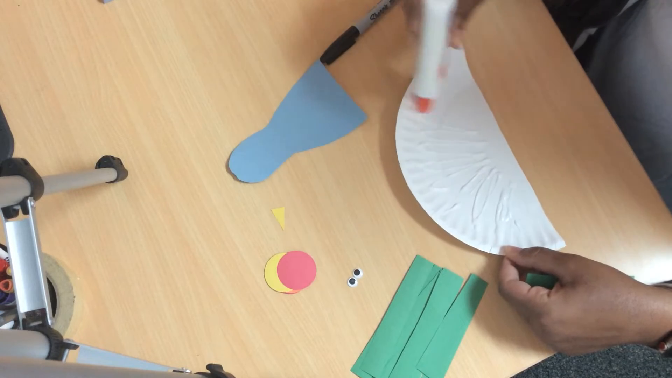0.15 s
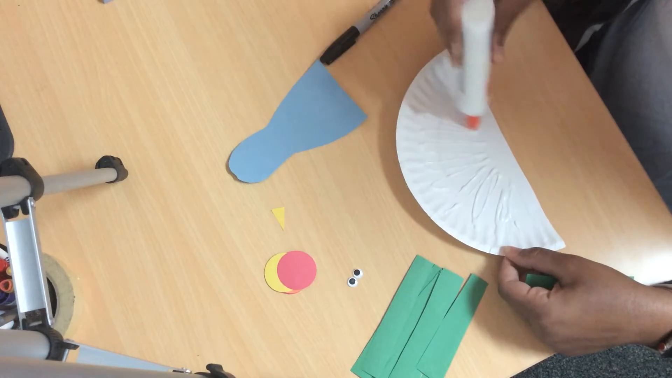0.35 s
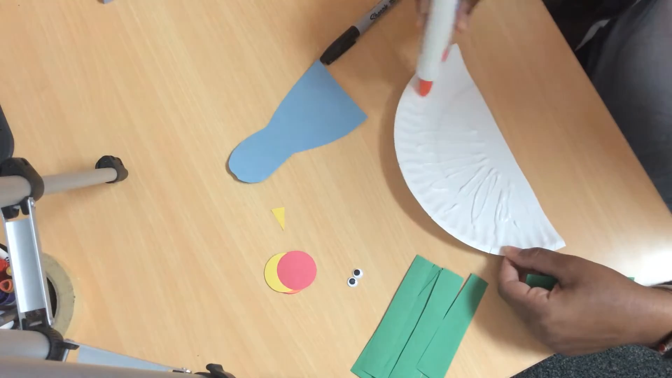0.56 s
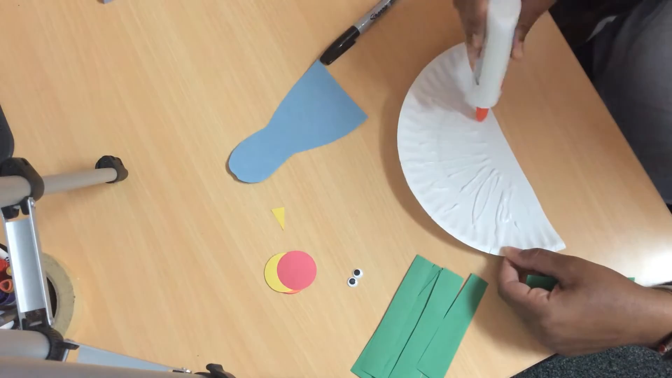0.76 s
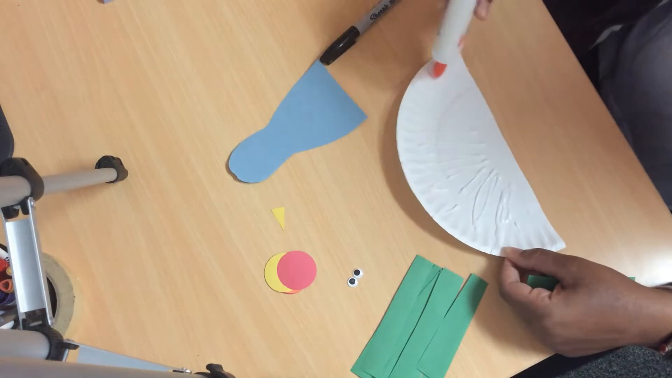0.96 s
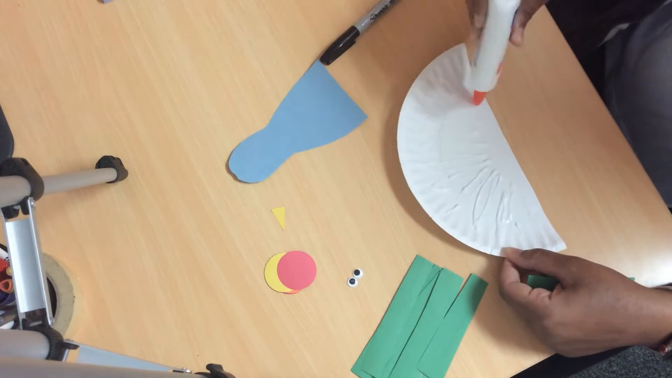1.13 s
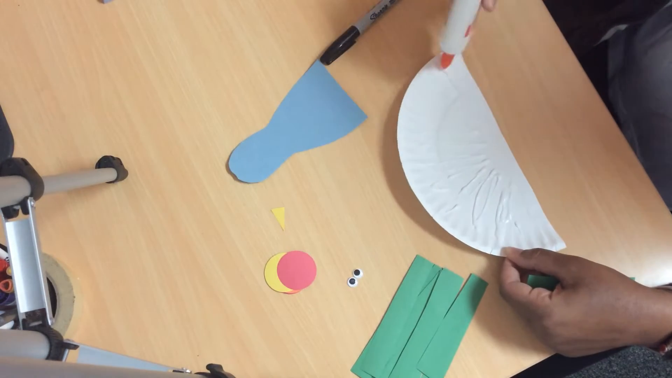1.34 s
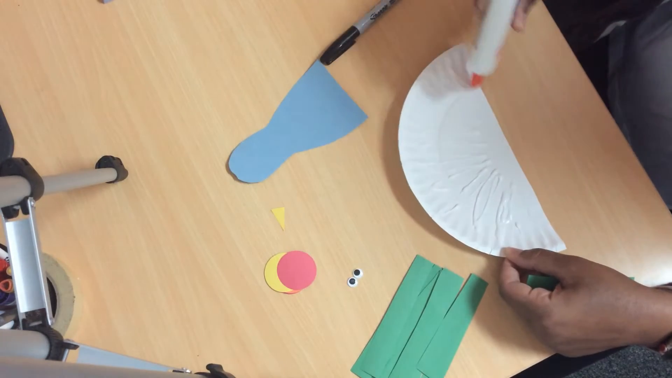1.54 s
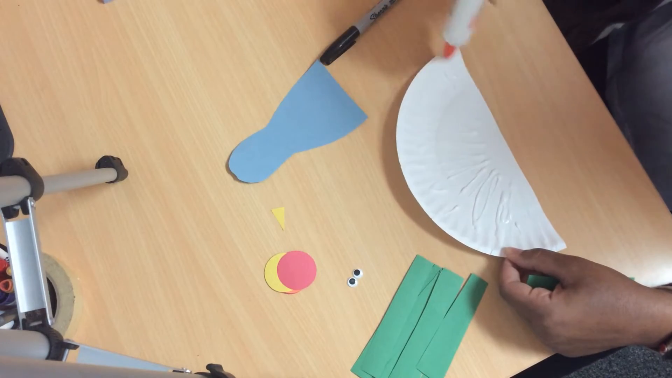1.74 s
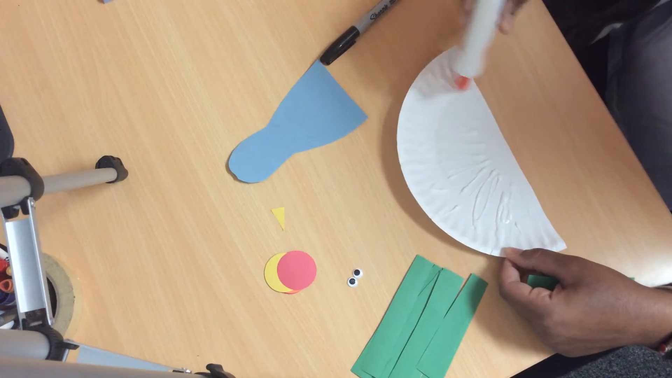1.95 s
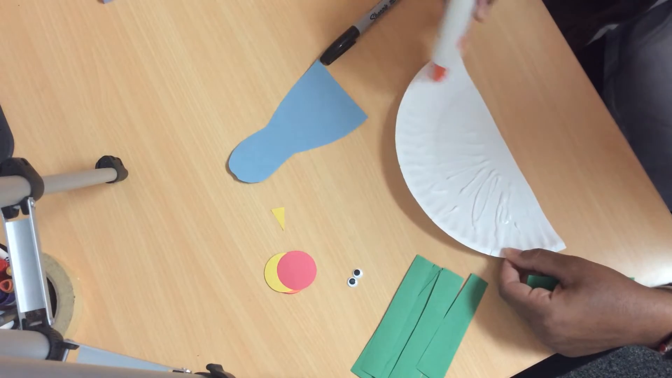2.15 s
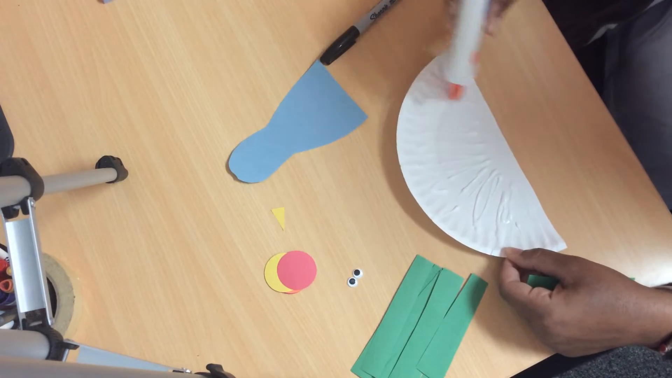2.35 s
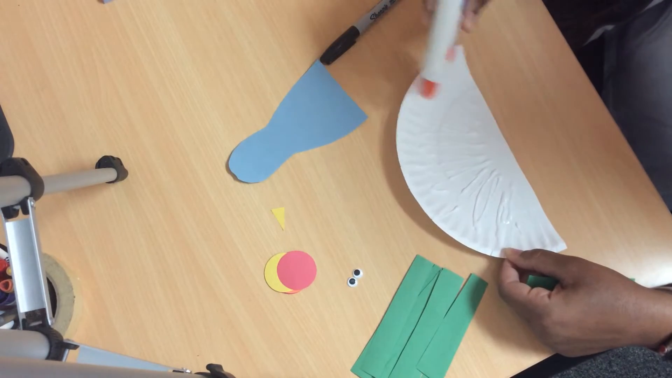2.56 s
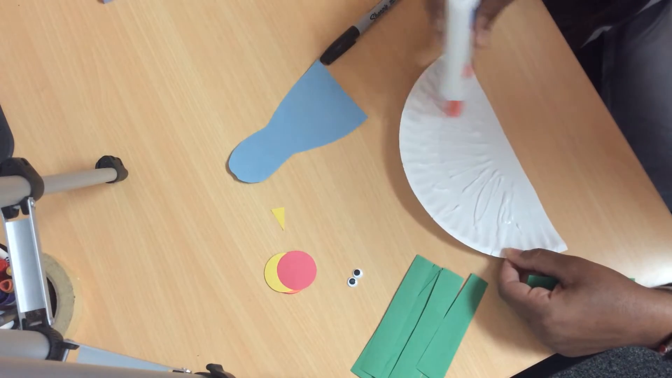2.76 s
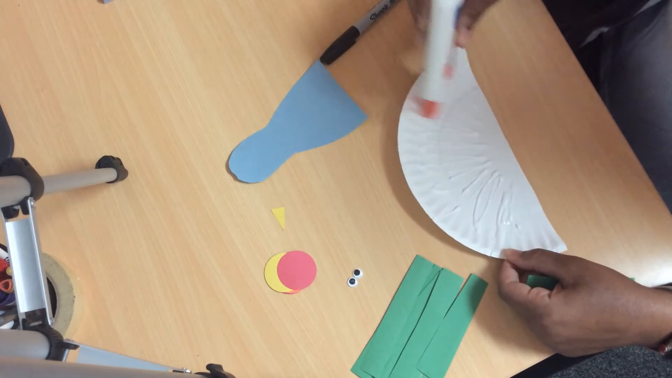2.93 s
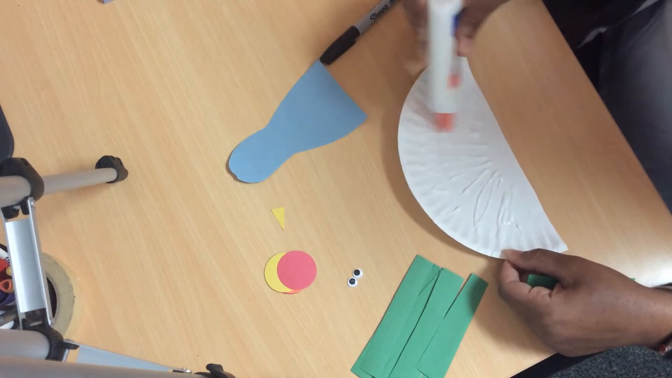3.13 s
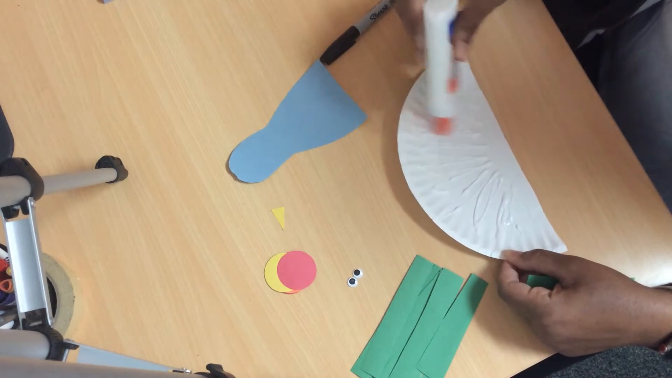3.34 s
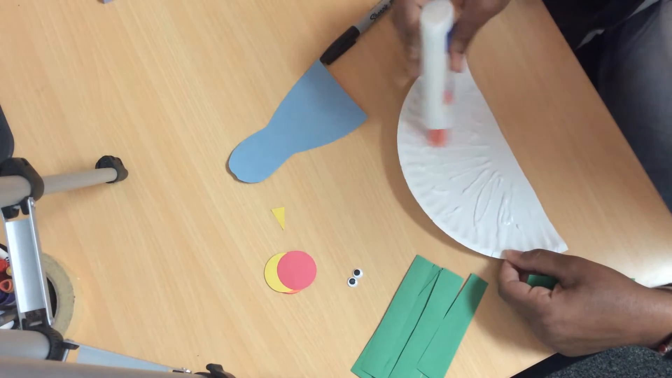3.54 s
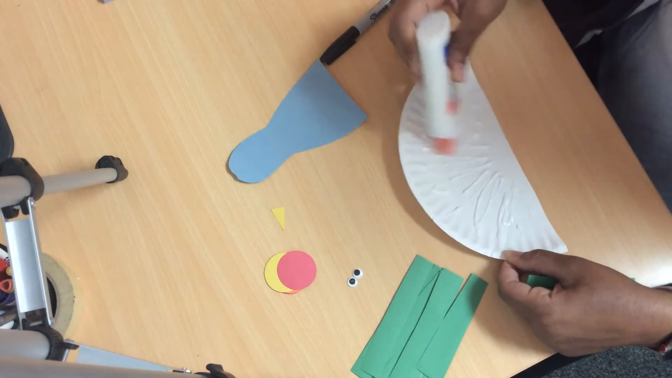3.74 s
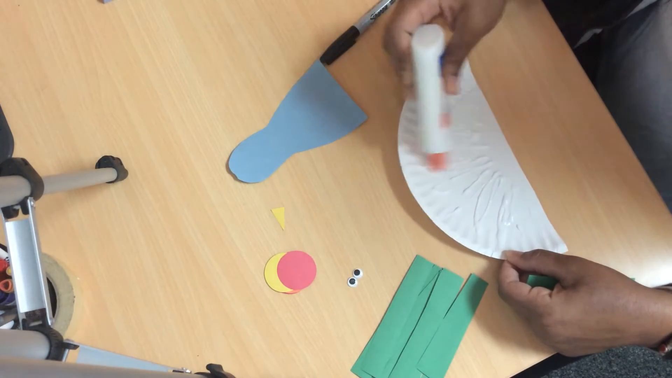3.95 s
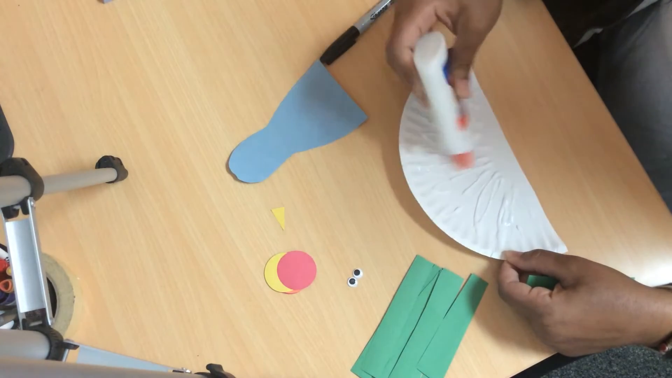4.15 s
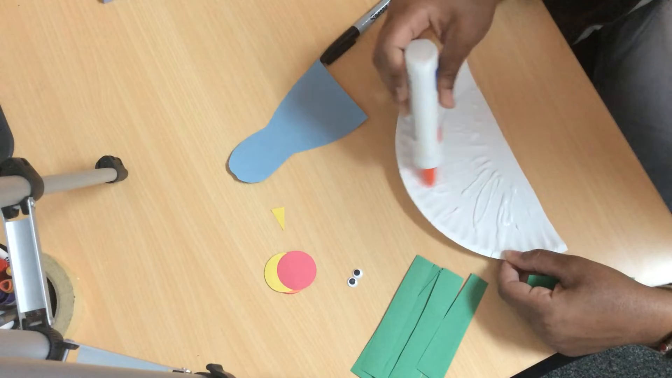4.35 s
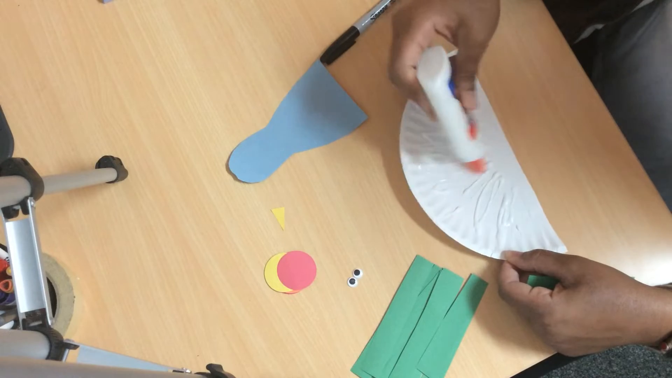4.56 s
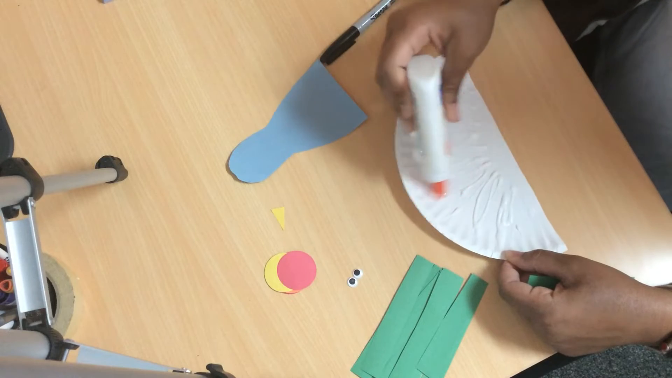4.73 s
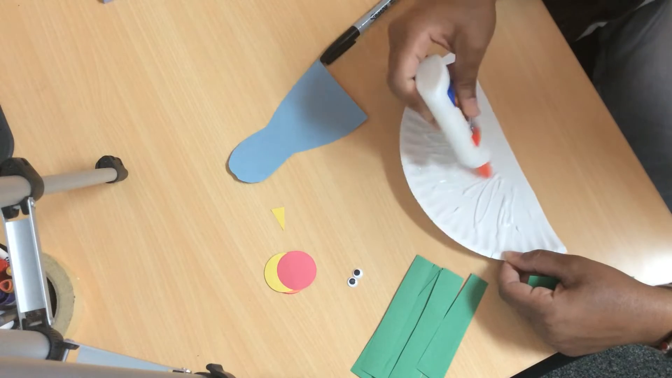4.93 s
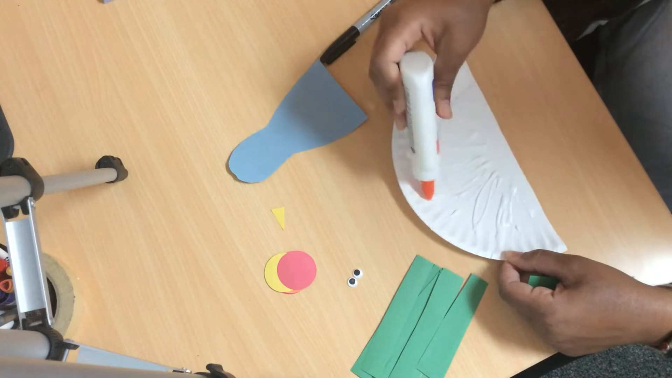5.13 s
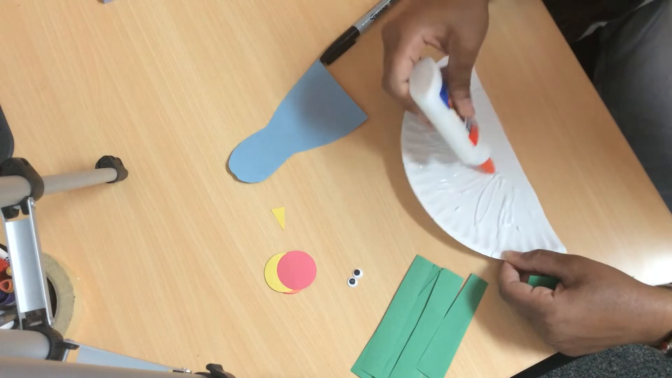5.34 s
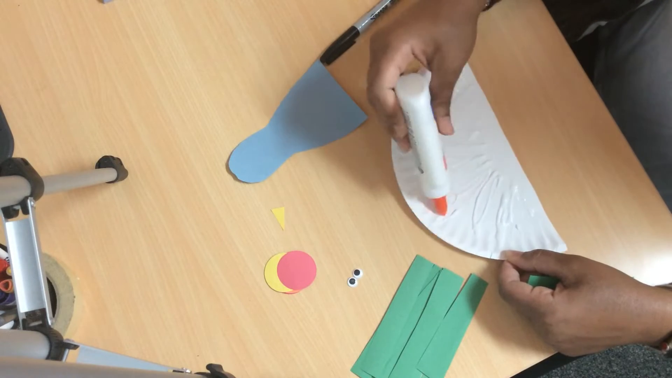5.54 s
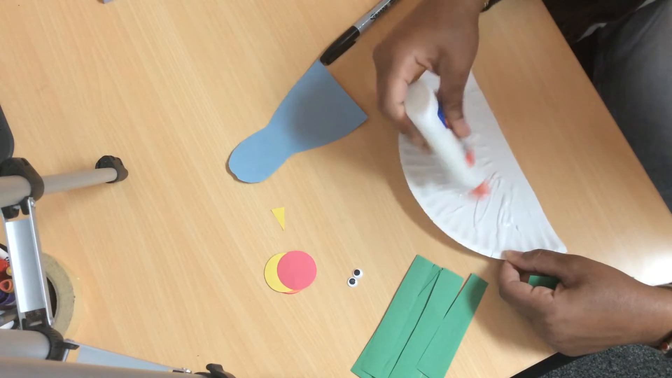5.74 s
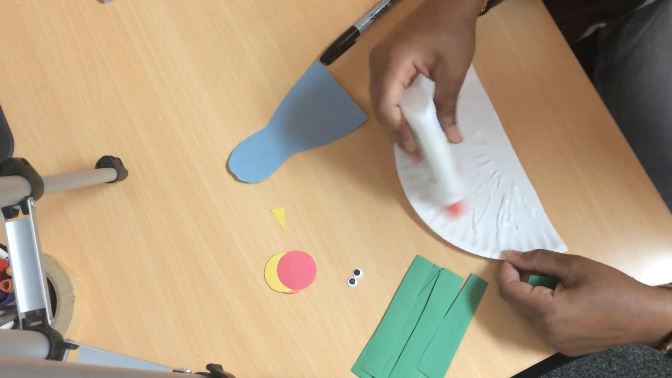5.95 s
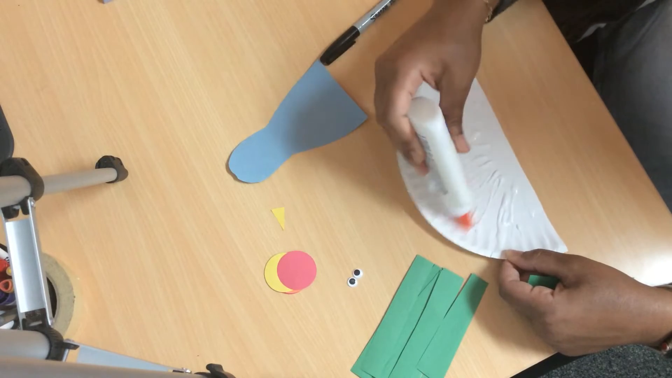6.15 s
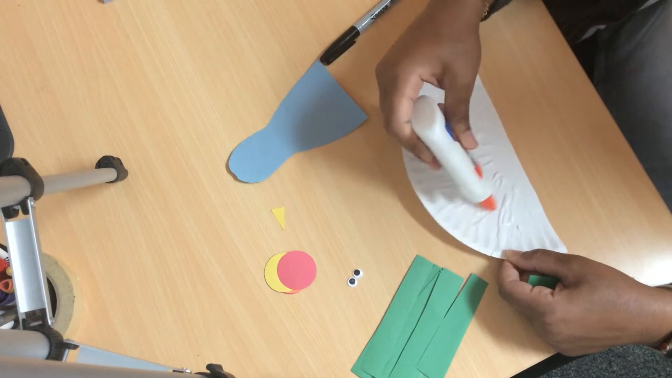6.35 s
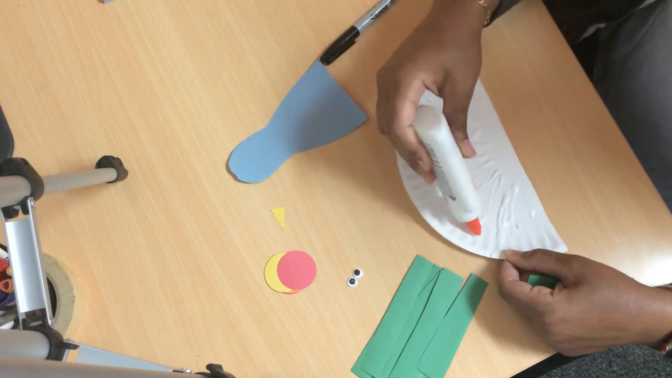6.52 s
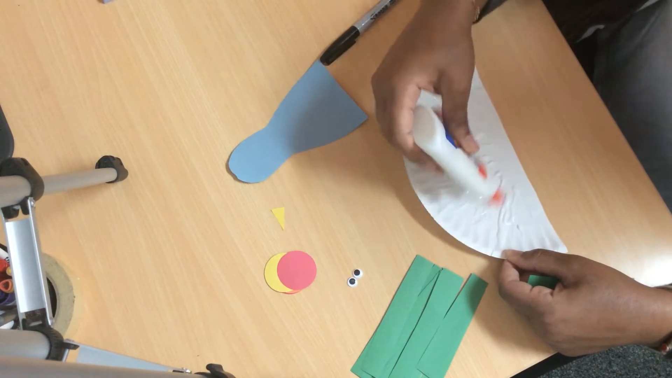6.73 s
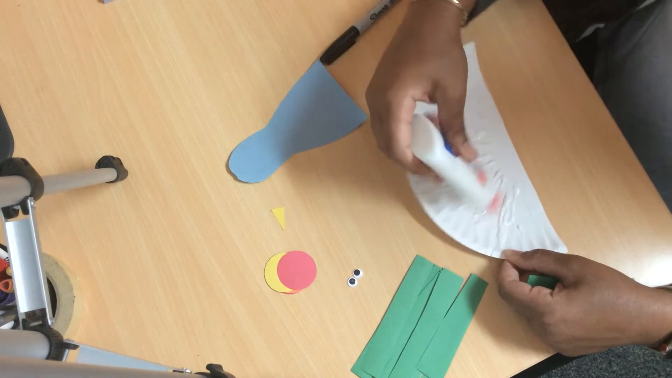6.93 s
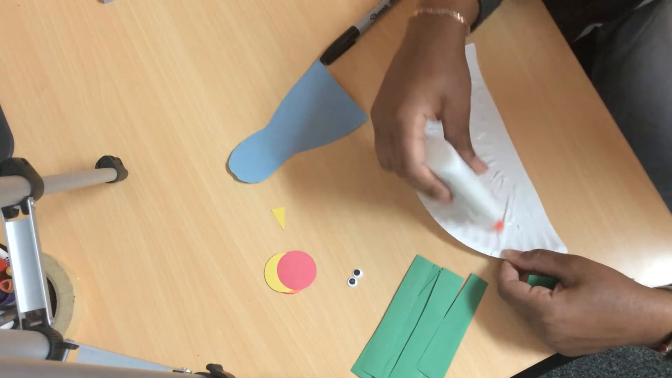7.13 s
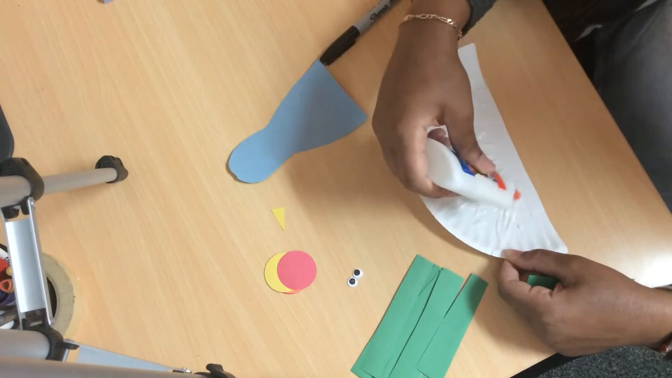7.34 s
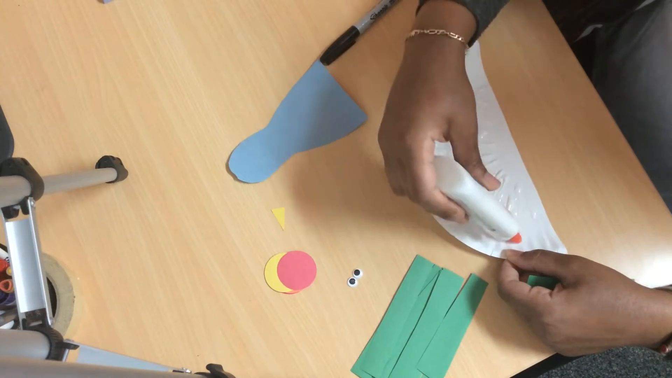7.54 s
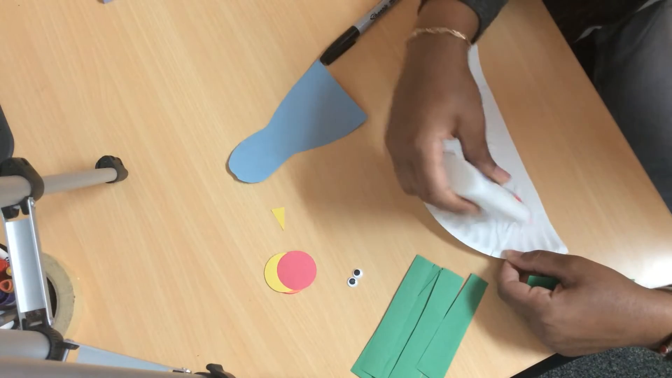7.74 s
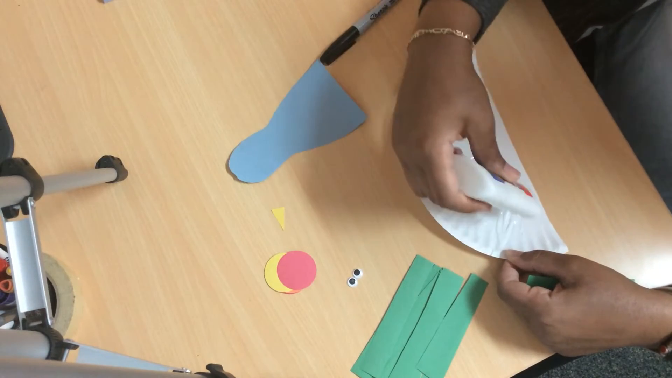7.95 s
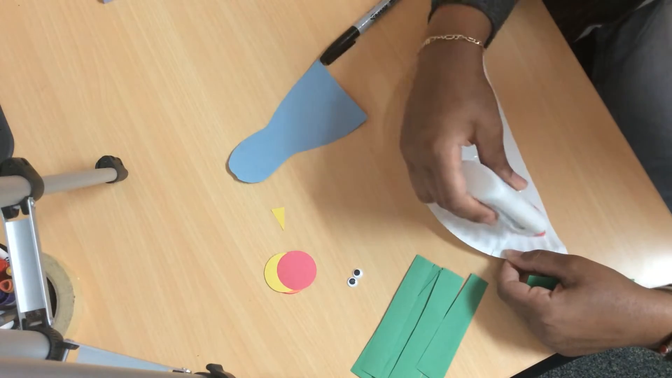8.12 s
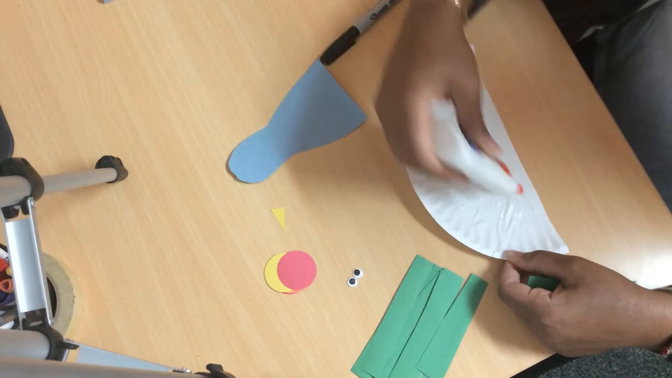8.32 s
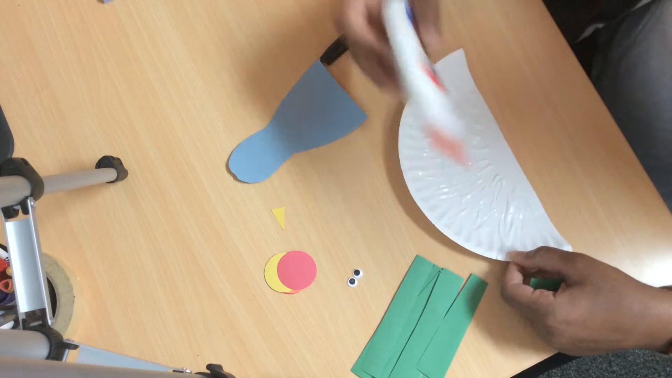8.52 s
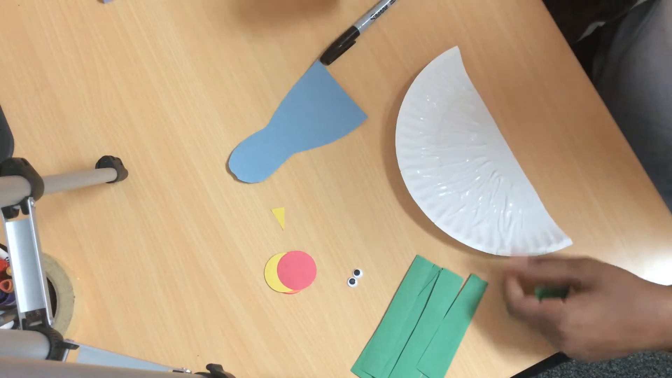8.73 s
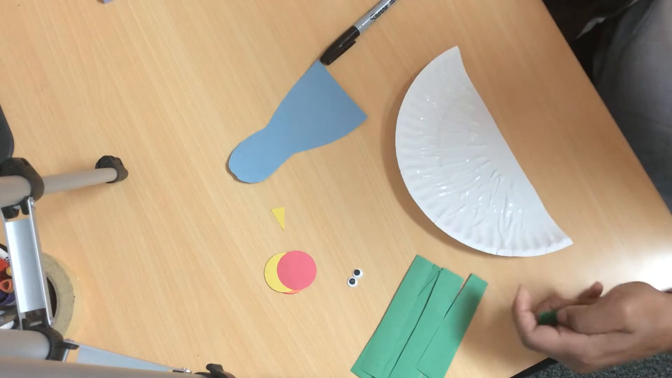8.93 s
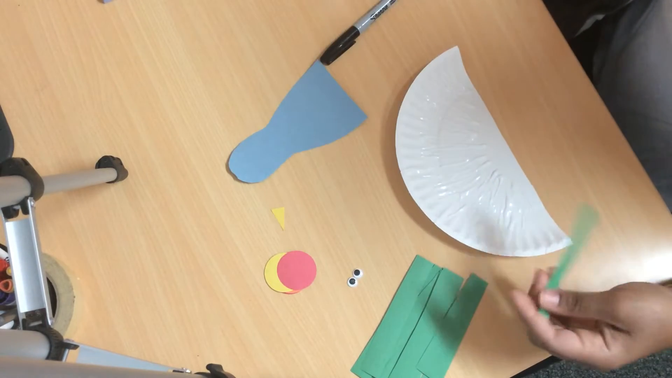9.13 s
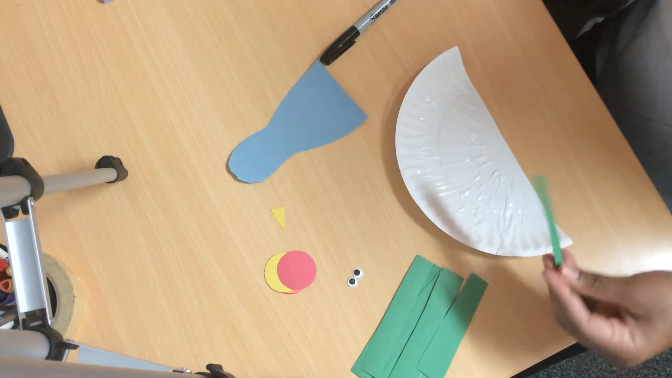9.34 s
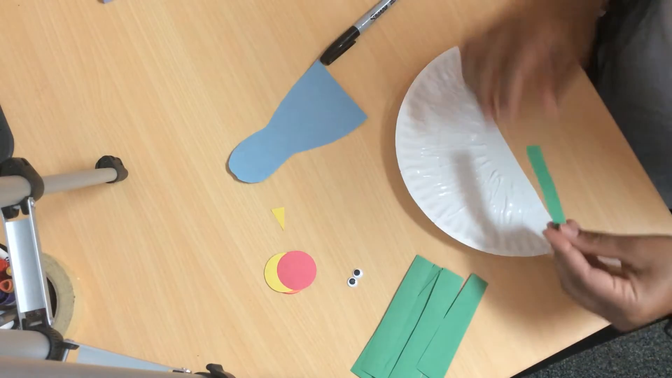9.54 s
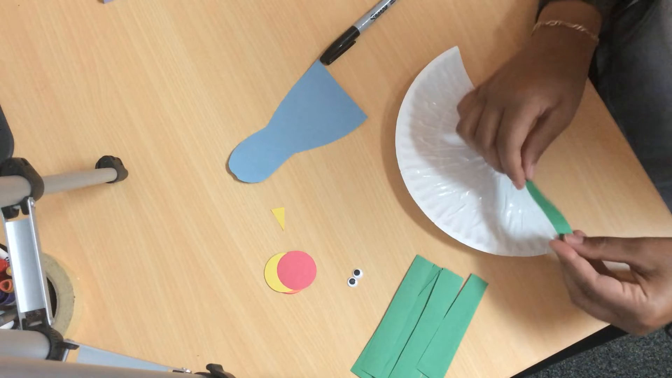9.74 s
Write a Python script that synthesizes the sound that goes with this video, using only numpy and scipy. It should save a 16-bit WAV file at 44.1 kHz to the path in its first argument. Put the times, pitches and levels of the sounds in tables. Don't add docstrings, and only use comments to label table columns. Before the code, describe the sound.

A glue bottle's nozzle scratches back and forth over a ridged paper plate with crisp ticks, then one loud knock on a wooden table.

```python
import sys
import numpy as np
from scipy import signal
from scipy.io import wavfile
from scipy.ndimage import uniform_filter1d

SR = 44100
rng = np.random.default_rng(int(sys.argv[2]) if len(sys.argv) > 2 else 0)


def unload_audio(sound):
    columns = np.transpose(np.atleast_2d(sound))
    steps = np.round(np.clip(columns, -1, 1) * 32767)
    wavfile.write(sys.argv[1], SR, steps.astype(np.int16))


def makeup_ratio(level_db):
    decades = np.asarray(level_db, float) / 20
    return 10 ** decades


N = 435708

# (fastest at [s], length [s], level
# [dB], brightness [dB])
STROKES = [(0.094, 0.16, -54, 1), (0.165, 0.11, -54.5, 7), (0.273, 0.16, -59.5, -8),
           (0.363, 0.11, -60.5, 3), (0.537, 0.14, -55.5, 4), (0.605, 0.13, -55.5, 7),
           (0.697, 0.093, -60, 1), (0.773, 0.23, -60, 7), (1.019, 0.18, -57, 4),
           (1.172, 0.19, -58.5, 6), (1.313, 0.054, -59, 6), (1.424, 0.18, -59, 2),
           (1.537, 0.085, -60.5, 4), (1.621, 0.062, -61, -3), (1.757, 0.061, -56, -4),
           (2.002, 0.1, -62.5, -11), (2.28, 0.18, -65.5, -6), (2.348, 0.15, -62, 8.5),
           (2.463, 0.06, -62, 1), (2.53, 0.057, -60, 5), (2.59, .06, -63, 2), (2.653, 0.078, -61.5, 0),
           (2.764, 0.13, -62, 5), (2.93, 0.2, -59.5, 1), (3.101, 0.16, -60, -3), (3.298, 0.13, -62, 7),
           (3.46, 0.26, -62.5, 3), (3.627, 0.16, -65.5, 11), (3.73, 0.039, -62, -16),
                (3.833, 0.086, -60, -9), (3.881, 0.17, -58, 8), (4.02, 0.11, -65.5, 6),
                (4.08, 0.14, -61.5, 10.5), (4.24, 0.17, -62.5, 9), (4.303, 0.11, -65, -2),
                (4.366, 0.07, -66.5, 0), (4.463, 0.078, -66, 18), (4.5, 0.055, -67, 4),
                (4.568, 0.11, -65, 11), (4.633, 0.15, -61, 5), (4.754, .06, -67.5, 7),
                (4.824, 0.14, -63.5, 9), (4.882, .06, -70, 4), (4.955, 0.095, -67, 9),
                (5.019, 0.16, -62, 10.5), (5.14, 0.11, -64.5, 8), (5.218, 0.12, -64.5, 7),
                (5.382, 0.18, -60, 12.5), (5.512, 0.098, -66, 8), (5.572, 0.11, -64, 11),
                (5.785, 0.29, -61.5, 7.5), (5.934, 0.1, -65.5, 14), (5.975, .06, -68, 5),
                (6.065, 0.22, -67.5, 12), (6.133, 0.11, -65, 0), (6.256, 0.2, -64.5, 8),
                (6.388, 0.16, -66.5, 13), (6.586, 0.077, -67, 15), (6.713, 0.23, -71, 25),
                (6.77, 0.061, -64, 4), (6.874, 0.14, -66.5, 10), (6.933, 0.12, -69.5, 16),
                (7.045, 0.14, -69, 19), (7.101, 0.078, -64.5, 3),
           (7.21, 0.11, -71.5, 12), (7.56, 0.18, -70, 17), (7.728, 0.17, -67, 9),
                (7.88, 0.21, -67, 14), (8.04, 0.21, -70.5, 13.5), (8.328, .08, -72, 14),
                (8.902, .1, -78, 18), (8.724, 0.53, -75.5, 14), (9.035, 0.071, -63.5, 18),
                (9.08, .05, -74, 18), (9.135, 0.13, -65.5, 20), (9.248, 0.25, -70.5, 10),
                (9.457, 0.064, -70, 9), (9.84, 0.21, -73.5, 17.5)]
# (time [s], level [dB], brightness [dB], plate shake [dB])
DRAG = [(0, -68, -5, -4), (1, -77, -17, -16), (1.5, -71, -24, 0), (2.2, -77.5, -29, -9),
        (3.6, -73, -15, -4.5), (5, -72.5, -9, 1), (6.4, -72, -5, -0.5), (7.4, -74.5, -15, -38),
        (8.5, -81, -22, -24), (9.88, -90, -25, -30)]
RISE_SHARE, EDGE_DB = 0.35, 17.5
# (frequency [Hz], level [dB per Hz])
SCRATCH = [(500, -6), (800, -0.5), (1400, -3.5), (2300, -4), (3600, -12.5), (5300, -5.5), (6500, -10),
           (8000, -7.5), (10000, -14.5), (12000, -11), (15500, -21), (18000, -27)]
HUMP_HZ, HUMP_FOLLOWS, HUMP_WANDER_OCT = 3670, 0.31, 0.063
DULL_PER_DB, DULL_WANDER_DB = 0.4052, 0.5
CRACKLE_PER_S, CRACKLE_DB = 400, 7
SPECK_PER_S, SPECK_CYCLES, SPECK_DB = 3000, 55, -1

# (time [s], peak [dB], paper pitch [Hz], t60 [s], broad snap [dB])
TICKS = [(0.1474, -36.5, 3530, 0.074, -19), (0.147, -43, 6520, 0.095, -14), (0.183, -41, 3730, 0.06, -20),
         (0.26, -47, 2870, .1, -20), (0.333, -34.5, 3340, 0.018, -34), (0.3333, -42, 5860, 0.018, -24),
         (0.5176, -44, 3690, 0.23, -28), (0.532, -42, 3650, 0.15, -28), (0.548, -40, 4200, .06, -26),
         (0.565, -41, 2900, .02, 0), (0.941, -38.5, 4100, 0.13, 3), (1.3045, -48, 2950, 0.074, -13),
         (1.3852, -38, 4600, 0.15, 13), (1.403, -40, 4800, 0.14, -9), (1.538, -45, 4600, 0.15, -1),
         (1.607, -48, 2970, .06, -10), (1.622, -44.5, 4500, .06, -5), (1.8028, -48, 2960, 0.32, 3),
         (2.663, -47, 4280, 0.041, -5), (2.7582, -45.5, 3900, 0.11, -6), (3.422, -41, 4700, 0.11, 6),
         (3.43, -41, 4870, 0.14, 19), (4.628, -35.5, 4600, 0.018, -1), (4.629, -39.5, 3300, 0.042, -18),
         (5.0155, -35.5, 4300, 0.042, -6), (5.0181, -38, 3270, 0.063, -21), (5.378, -36, 4500, 0.041, 13),
         (5.383, -36, 3260, .025, -23), (5.3837, -33, 4070, 0.041, -30), (5.394, -47, 4500, .05, -10),
         (5.7713, -33.5, 4300, 0.027, -9), (5.775, -36.5, 3000, 0.032, -7), (5.782, -48, 3900, 0.099, -6),
         (6.133, -41.5, 3930, 0.021, -5), (6.134, -48, 2700, .018, 3), (6.4674, -44.5, 4000, 0.025, -6),
         (6.469, -44.5, 3000, 0.02, -4), (6.7566, -43, 4000, 0.025, 2), (6.758, -45, 2900, .018, 3),
         (7.458, -49.5, 3750, .02, 6)]
# (time [s], peak [dB], paper
# pitch [Hz], t60 [s], broad snap [dB])
BRIGHT_TICKS = [
    (0.5918, -37.5, 6400, 0.064, 14),
    (0.5943, -35, 4500, 0.045, -2),
    (1.1942, -41.5, 7300, 0.058, -13),
    (1.7484, -44, 3480, .04, 7),
    (1.7495, -48, 7500, 0.095, 12),
    (1.885, -54, 4500, .03, 6),
]
# (time [s], peak [dB], paper pitch [Hz])
SNAGS = [(0.07, -58, 3390), (.1, -43, 2830), (0.4954, -52, 3820), (0.534, -50, 2600), (0.603, -46, 4060),
         (0.6946, -45, 3700), (.752, -48, 3650), (0.7725, -50, 5460), (0.981, -54, 3420),
         (0.9986, -47.5, 3560), (1.132, -53, 5100), (1.1725, -45, 4500), (1.21, -43, 4500),
         (1.952, -58, 4000), (1.983, -50, 6700), (1.996, -49, 3620), (2.0774, -53.5, 4330),
         (2.4974, -57, 4460), (2.5149, -55, 7620), (2.5305, -52, 4430), (2.5703, -51.5, 3540),
         (2.6406, -57, 3630), (2.881, -49, 3900), (2.914, -44, 4020), (3.072, -58, 3700),
         (3.109, -45, 3770), (3.8056, -52, 3680), (3.8545, -51, 3370), (3.866, -54, 5500),
         (4.064, -52, 4500), (4.078, -46, 3800), (4.232, -49, 4500), (4.29, -53, 3800), (4.444, -59, 4410),
         (4.558, -60, 4200), (4.8107, -57.5, 8000), (5.4033, -48, 3220), (5.568, -55, 3540),
         (5.7237, -52.5, 8100), (5.97, -52, 3750), (6.048, -50, 7840), (6.2386, -57, 3140),
         (6.589, -54, 7760), (7.188, -56, 3640)]
SNAG_T60_S, SNAG_BRIGHT_DB = 0.066, 0
TICK_RISE_S, SNAG_RISE_S = 0.0003, 0.002
# (frequency [Hz], level [dB])
SPANS = [(2000, 2.5), (2550, -3), (2880, 2.5), (3300, 0.5), (3690, 0.5), (3920, -5.5), (4150, -1),
         (4490, 1.5), (4800, -0.5), (5250, 4), (5700, 4), (6450, 6), (7500, 2.5), (8100, -6)]
SPAN_WIDTH, SPAN_REACH_OCT, SPAN_SPREAD_DB = 0.082, 0.21, 3.5
# (frequency [Hz], level [dB])
FLEX = [
    (1050, -10),
    (1430, 2),
    (1800, 11),
]
FLEX_DB, CLICK_DB = -8.5, -7.5
SNAP_BELOW, SNAP_ABOVE = 2.6, 1.9

# (time [s], peak [dB], contact pitch [Hz])
TAPS = [(0.045, -53.5, 403), (0.566, -52, 637), (0.8, -46, 563), (1.194, -44.5, 760), (1.231, -52, 600),
        (2.001, -43, 700), (2.656, -49.5, 600), (3.866, -48, 800), (4.246, -54, 950), (5.379, -55, 977),
        (8.451, -44.5, 517), (8.481, -74, 400), (9.1955, -47, 643)]
# (frequency [Hz], level [dB], t60 [s])
PLATE = [(282, -5, 0.071), (403, -11.5, 0.034), (540, -7, 0.031), (738, -15.5, 0.067), (1010, -5.5, 0.027),
         (1470, -3.5, 0.01), (1870, -17, 0.061)]
# (time [s], peak [dB])
KNOCK = [
    (9.026, -17.5),
]
# (frequency [Hz], level [dB], t60 [s])
TABLE = [(85, -3, 0.25), (109.6, -6.5, 0.33), (140, -13, 0.042), (214, -13.5, 0.16), (252, -13, 0.22),
         (336, -9.5, 0.22), (407, -20, 0.17), (440, -14.5, 0.15), (540, -16, 0.1), (670, -25, 0.12),
         (734, -2.5, 0.024), (1025, -12.5, 0.067), (1220, -9, 0.034), (1530, -20, 0.055)]
# (frequency [Hz], level [dB per Hz])
RATTLE = [(240, -32), (400, -7), (760, -1), (1050, -17), (1550, -12.5), (2250, -16), (2790, -19.5),
          (3560, -27), (4900, -16), (5700, -45), (7550, -43), (15500, -32)]
BOOM_HZ, BOOM_DB, SETTLE_S = 166, 0, 0.027
LEAD_S, LEAD_DB = 0.0081, -19
REBOUND_S, REBOUND_DB = 9.148, -12

ROOM_T60_S, ROOM_DB, KNOCK_ROOM_DB = 0.26, -12, 2
# (frequency [Hz], level [dB per Hz])
AIR = [(12, -73), (20, -13), (32, -23), (54, -7), (114, 5.5), (152, -6.5), (220, -8), (243, -16.5),
       (323, -21), (526, -26.5), (1100, -30.5), (1430, -87), (2420, -120)]
# (frequency [Hz], level [dB per Hz])
HISS = [(800, -33), (1150, -6), (1450, 1.5), (1800, 5), (2200, -18), (2600, -14.5), (3600, -15.5),
        (6000, -23), (10400, -19), (16000, -35)]
AIR_DB, HISS_DB = -46, -64
# (frequency [Hz], width [Hz], rms [dB])
DUCT = [(65.9, 2.7, -58.5), (82.7, 3, -59.5), (101.7, 11, -56.5), (119.84, 8.4, -52), (213.55, 5.9, -59.5),
        (324.2, 19.6, -68.5), (419.6, 5.8, -75.5), (428, 2.5, -79), (494.4, 14.5, -75), (746, 36, -86),
        (1028, 51, -81), (1353, 26, -81.5), (1550, 14, -74.5), (1648, 120, -77)]
# (time [s], rumble [dB], whoosh [dB])
FLOW = [(0, -0.5, 2.5), (.7, 0, -0.5), (1.1, -1, 0.5), (1.6, 0.5, 1.5), (2.1, 0, 0), (2.7, 0.5, 0),
        (3.5, 0, -0.5), (4.2, 0, 0), (4.75, 2, 0.5), (5.2, -1.5, -1), (5.8, 0.5, 1), (6.3, -1.5, -2),
        (7.1, -1.5, -1), (7.7, 0, 0), (8.3, 1, -1), (8.8, 0, -0.5), (9.4, -1.5, 0.5), (9.88, -1.5, -1)]
WHOOSH_FROM_HZ = 240


def rms_one(x):
    return x / np.sqrt(np.mean(x ** 2) + 1e-20)


def drift(rate):
    r = np.exp(-80 * np.pi * rate / SR)
    slow = signal.lfilter([1], [1, -2 * r, r * r], rng.standard_normal(N // 40 + 2002))[2000:]
    return np.interp(np.arange(N) / 40, np.arange(len(slow)), rms_one(slow))


def resonance(x, hz, width_hz):
    r = np.exp(-np.pi * width_hz / SR)
    return signal.lfilter([(1 - r * r) / 2, 0, (r * r - 1) / 2], [1, -2 * r * np.cos(2 * np.pi * hz / SR), r * r], x)


def ring(clicks, modes):
    out = 0
    for k, (hz, level_db, t60) in enumerate(modes):
        r, w = makeup_ratio(-60 / (t60 * SR)), 2 * np.pi * hz / SR
        mode = signal.lfilter([0, np.sin(w)], [1, -2 * r * np.cos(w), r * r], clicks + 1e-18)
        out = out + (-1) ** k * makeup_ratio(level_db) * mode
    return out


def bandpass(x, low_hz, high_hz):
    return signal.sosfilt(signal.butter(2, [low_hz, high_hz], "band", fs=SR, output="sos"), x)


def bank(sources, spectrum, extra_db):
    hz_at, db_at = np.transpose(spectrum)
    count = int(3 * np.log2(hz_at[-1] / hz_at[0])) + 1
    edges = np.geomspace(hz_at[0], min(hz_at[-1], 19000), count)
    out = 0
    for k, (low, high) in enumerate(zip(edges, edges[1:])):
        hz = np.sqrt(low * high)
        level_db = np.interp(np.log(hz), np.log(hz_at), db_at) + extra_db(hz)
        out = out + makeup_ratio(level_db) * bandpass(sources[k % 2], low, high)
    return out


def add(track, s, sound):
    i = round(s * SR)
    track[i:i + len(sound)] += sound[:N - i]


def rubbing():
    level_db, bright_db, shake_db, span_hz = strokes()
    hump_hz = span_hz * 2 ** (HUMP_WANDER_OCT * drift(1.1))
    dull_db = shake_db + DULL_WANDER_DB * drift(3.6)
    slips = makeup_ratio(2.0 * drift(23.0) + 0.9 * drift(170.0)) * rng.standard_normal((2, N))
    torn = rng.random(N) < CRACKLE_PER_S / SR * makeup_ratio(6.0 * drift(40.0))
    slips *= 1 + makeup_ratio(CRACKLE_DB) * torn
    pressure = np.clip((level_db + 78) / 22, 0.3, 1.2)

    def share(hz, low_hz, high_hz):
        return np.clip(np.log(hz / low_hz) / np.log(high_hz / low_hz), 0, 1)

    def tilt(hz):
        return (bright_db - 2) * share(hz, 2800, 10700) + dull_db * (1 - share(hz, 1700, 2130))

    def hump(hz):
        return pressure * np.exp(-(np.log(hz / hump_hz) / 0.19) ** 2)

    paper = bank(slips, SCRATCH, lambda hz: tilt(hz) + 4.2 * hump(hz) + 1.2 * drift(10.0))
    rings = specks(lambda hz: 12.0 * hump(hz))
    return makeup_ratio(level_db - 2.5) * (rms_one(paper) + makeup_ratio(SPECK_DB) * rms_one(rings))


def strokes():
    t = np.arange(0, N + 220, 220) / SR
    s, length, level_db, bright_db = np.transpose(STROKES)[:, :, None]
    phase = (t - s) / (length * np.where(t < s, RISE_SHARE, 1 - RISE_SHARE))
    drag_s, *columns = np.transpose(DRAG)
    drag_db, drag_bright_db, shake_db = [np.interp(t, drag_s, c) for c in columns]
    power = makeup_ratio(level_db - EDGE_DB * np.abs(phase) ** 1.74) ** 2
    drag = makeup_ratio(drag_db) ** 2
    total = power.sum(axis=0) + drag
    total_db = 10 * np.log10(total)
    bright = ((power * bright_db).sum(axis=0) + drag * drag_bright_db) / total
    shake = shake_db + DULL_PER_DB * (total_db - drag_db)
    catch_s, _, catch_hz = np.transpose(sorted(row[:3] for row in TICKS + BRIGHT_TICKS + SNAGS))
    nearest_hz = np.interp(t, catch_s, np.minimum(catch_hz, 5300))
    span_hz = HUMP_HZ * (nearest_hz / HUMP_HZ) ** HUMP_FOLLOWS
    return [np.interp(np.arange(N) / SR, t, c) for c in (total_db, bright, shake, span_hz)]


def specks(colour_db):
    sizes = makeup_ratio(2.8 * np.minimum(rng.exponential(1, N), 3.5))
    snaps = sizes * (rng.random(N) < SPECK_PER_S / SR * makeup_ratio(2.5 * drift(30)))
    dealt = rng.integers(0, len(SPANS), N)
    out = 0
    for k, (hz, db) in enumerate(SPANS):
        soft = resonance(snaps * (dealt == k) * makeup_ratio(colour_db(hz)) + 1e-18, hz, 0.12 * hz)
        out = out + ring(soft, [(hz, db, SPECK_CYCLES / hz)])
    return out


def catches():
    out, t = np.zeros(N), np.arange(SR // 8) / SR
    rows = [(*row, TICK_RISE_S) for row in TICKS + BRIGHT_TICKS]
    rows += [(*row, SNAG_T60_S, SNAG_BRIGHT_DB, SNAG_RISE_S) for row in SNAGS]
    draws = rng.standard_normal((len(rows), 2, len(t)))
    for (s, peak_db, hz, t60, bright_db, rise_s), (fine, lumps) in zip(rows, draws):
        clumps = makeup_ratio(2.3 * rms_one(uniform_filter1d(lumps, size=60)))
        decay = clumps * makeup_ratio(-60 * t / t60) + 1.1 * np.exp(-t / 0.0029)
        burst = fine * decay * (1 - np.exp(-t / rise_s))
        spans = 0
        for (span_hz, db), chance in zip(SPANS, lumps):
            reach = np.exp(-(np.log2(span_hz / hz) / SPAN_REACH_OCT) ** 2)
            sharp = resonance(burst, span_hz, SPAN_WIDTH * span_hz)
            spans = spans + makeup_ratio(db + SPAN_SPREAD_DB * chance) * reach * resonance(sharp, span_hz, 0.31 * span_hz)
        flex = sum(makeup_ratio(db) * resonance(burst, flex_hz, 0.2 * flex_hz) for flex_hz, db in FLEX)
        low_hz, high_hz = hz / SNAP_BELOW, hz * SNAP_ABOVE
        broad = rms_one(bandpass(burst, low_hz, high_hz))
        snap = rms_one(spans) + makeup_ratio(bright_db) * broad + makeup_ratio(FLEX_DB) * rms_one(flex)
        click = bandpass(fine * np.exp(-t / 0.0002), low_hz, high_hz)
        click = makeup_ratio(CLICK_DB + bright_db / 2) * (rise_s < SNAG_RISE_S) * click
        add(out, s, makeup_ratio(peak_db - 1.0) * (snap / np.abs(snap).max() + click))
    return out


def taps():
    out, t = np.zeros(N), np.arange(SR // 4) / SR
    spread = rng.normal(0, 2, (len(TAPS), len(PLATE)))
    drag = 0.04 * np.exp(-t / 0.014) * (1 - np.exp(-t / 0.002))
    pushes = rng.standard_normal((len(TAPS), len(t))) * drag + 0.4 * signal.unit_impulse(len(t))
    for (s, peak_db, cut_hz), row, push in zip(TAPS, spread, pushes):
        modes = [(hz, db + d, t60) for (hz, db, t60), d in zip(PLATE, row)]
        softness = signal.butter(2, 1.37 * cut_hz, fs=SR, output="sos")
        body = signal.sosfilt(softness, ring(push, modes))
        add(out, s, makeup_ratio(peak_db + 2.5) * body / np.abs(body).max())
    return out


def knock():
    out, t = np.zeros(N), np.arange(SR // 2) / SR
    (s, peak_db), = KNOCK
    body = ring(np.exp(-t / 0.000096) / (0.00016 * SR + 1), TABLE)
    hold = (1 - np.exp(-t / 0.0013)) * makeup_ratio(-40 * t - 2200 * np.maximum(t - SETTLE_S, 0))
    boom = makeup_ratio(BOOM_DB) * hold * np.sin(2 * np.pi * BOOM_HZ * t)
    rattle = bank(rng.standard_normal((2, len(t))), RATTLE, lambda hz: -60 * t / (0.06 * (hz / 3000) ** 0.05))
    add(out, s, makeup_ratio(peak_db - 2.5) * (body + boom) + makeup_ratio(peak_db - 15.5) * rattle / np.abs(rattle).max())
    press = -np.sin(2 * np.pi * t / LEAD_S) * (t < LEAD_S)
    add(out, s - LEAD_S, makeup_ratio(peak_db + LEAD_DB) * press)
    swing = ring(signal.unit_impulse(len(t)), [(78.0, 0, 0.12), (117.0, 0, 0.05)])
    add(out, REBOUND_S, makeup_ratio(peak_db + REBOUND_DB) * swing)
    return out


def room(x):
    t = np.arange(SR // 2) / SR
    tail = rng.standard_normal(len(t)) * makeup_ratio(-60 * t / ROOM_T60_S) * (t > 0.004)
    tail = bandpass(tail, 300, 6000)
    return makeup_ratio(ROOM_DB) * signal.fftconvolve(x, tail / np.sqrt(np.sum(tail ** 2)))[:N]


def ventilation():
    white = rng.standard_normal((3, N))
    s, *columns = np.transpose(FLOW)
    low_db, mid_db = [np.interp(np.arange(N) / SR, s, c) for c in columns]

    def flow_db(hz):
        return low_db if hz < WHOOSH_FROM_HZ else mid_db

    rumble = rms_one(bank(white, AIR, flow_db))
    hiss = rms_one(bank(white[::-1], HISS, lambda hz: 1.55 * drift(15.6)))
    tones = 0
    for hz, width_hz, db in DUCT:
        tone = resonance(resonance(white[2], hz, width_hz), hz, width_hz)
        tones = tones + makeup_ratio(db + flow_db(hz)) * rms_one(tone)
    return makeup_ratio(AIR_DB) * rumble + makeup_ratio(HISS_DB) * hiss + tones


def scene():
    hits, thud = catches() + taps(), knock()
    reflections = room(hits + makeup_ratio(KNOCK_ROOM_DB) * thud)
    return (rubbing() + hits + thud + reflections + ventilation())[None]


def roll_off(x):
    return signal.sosfilt(signal.butter(12, 15790, fs=SR, output="sos"), x)


def record(dry):
    x = signal.sosfilt(signal.butter(2, 22, "high", fs=SR, output="sos"), dry)
    x = x + 0.73 * resonance(x, 8140, width_hz=390)
    x = x - 0.45 * resonance(x, 13000, width_hz=1000)
    x = signal.sosfilt(signal.cheby2(12, 50, 16400, fs=SR, output="sos"), x)
    return roll_off(x)


dry = scene()
out = record(dry)
unload_audio(out)
```